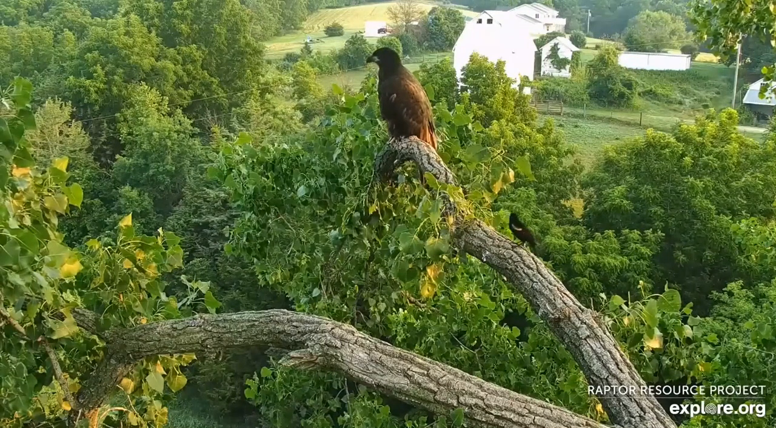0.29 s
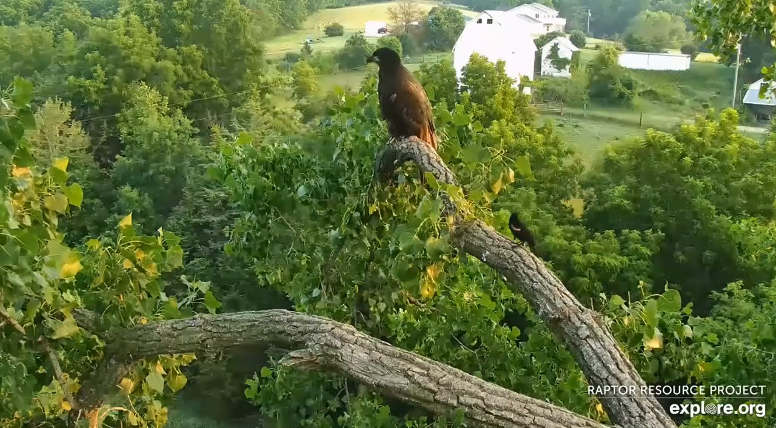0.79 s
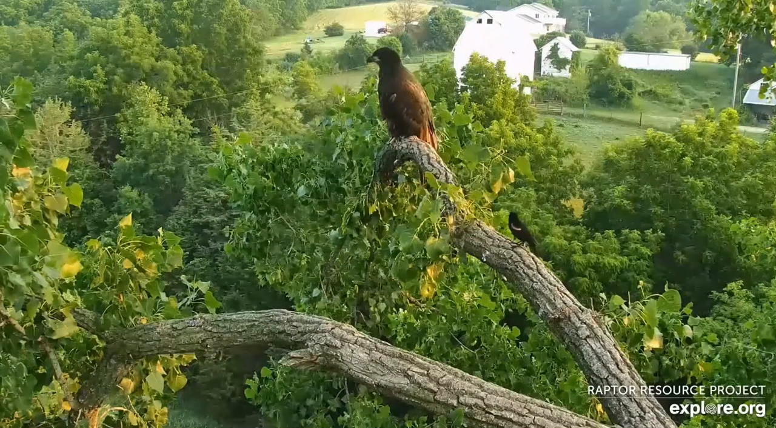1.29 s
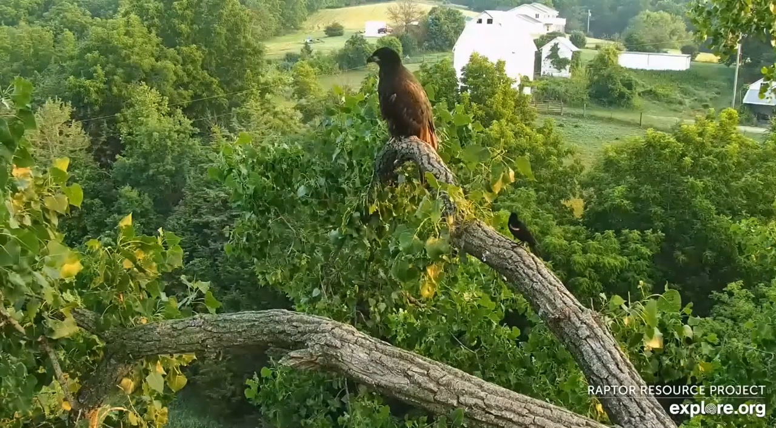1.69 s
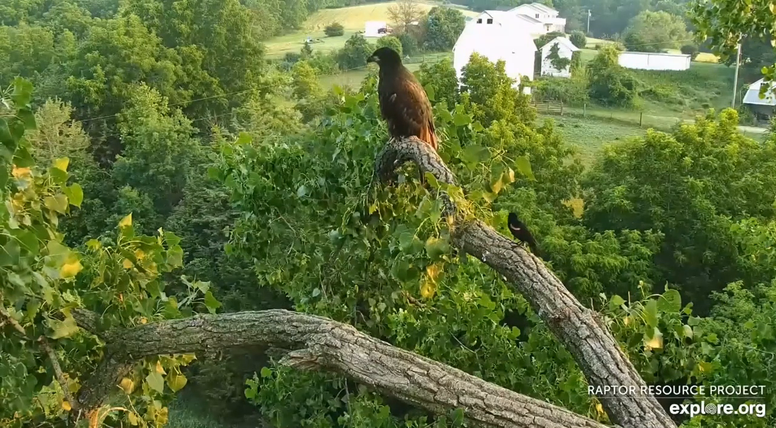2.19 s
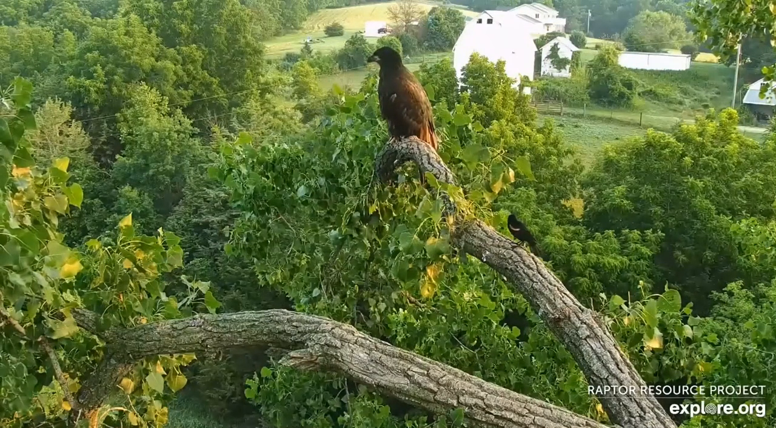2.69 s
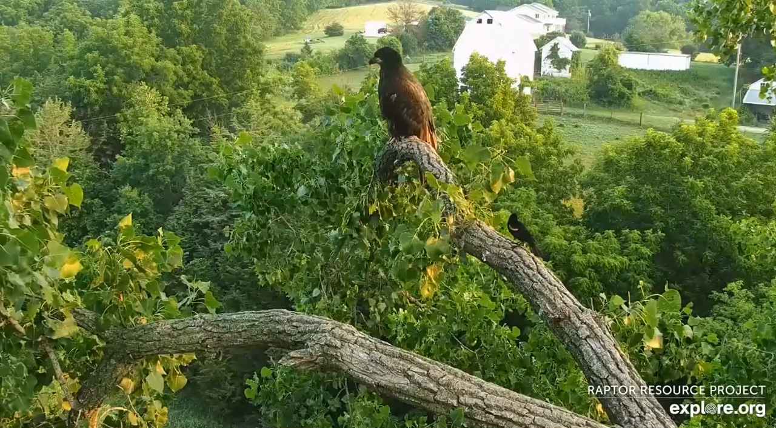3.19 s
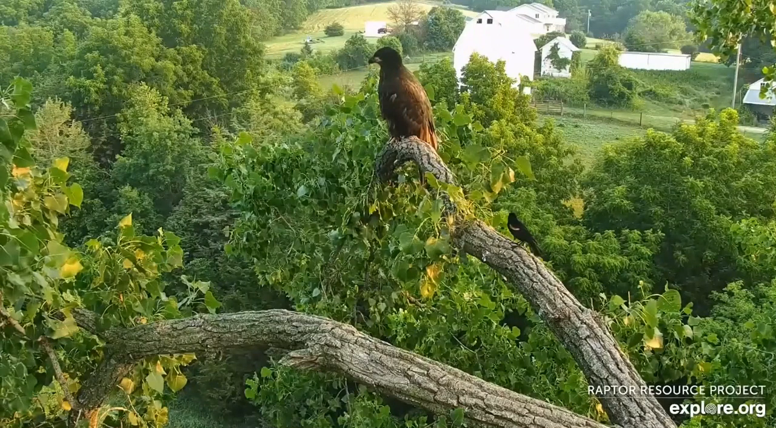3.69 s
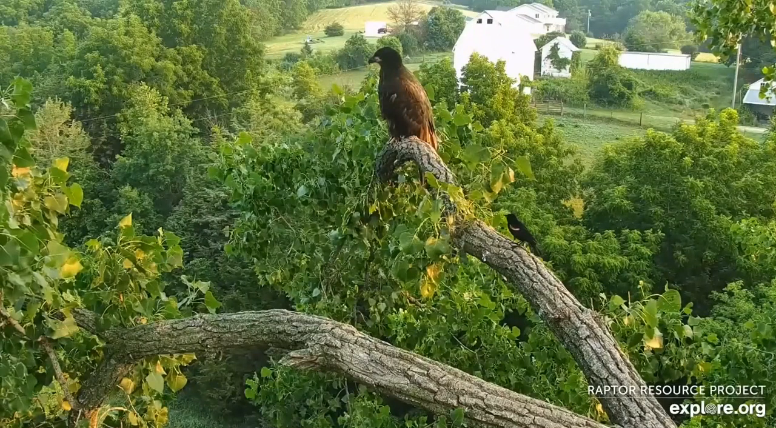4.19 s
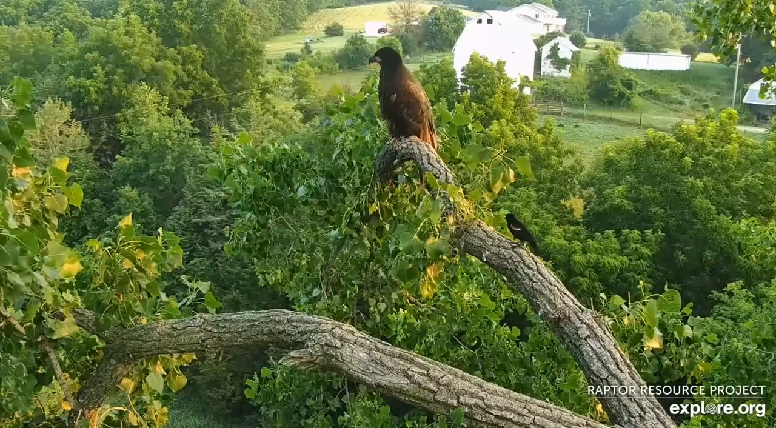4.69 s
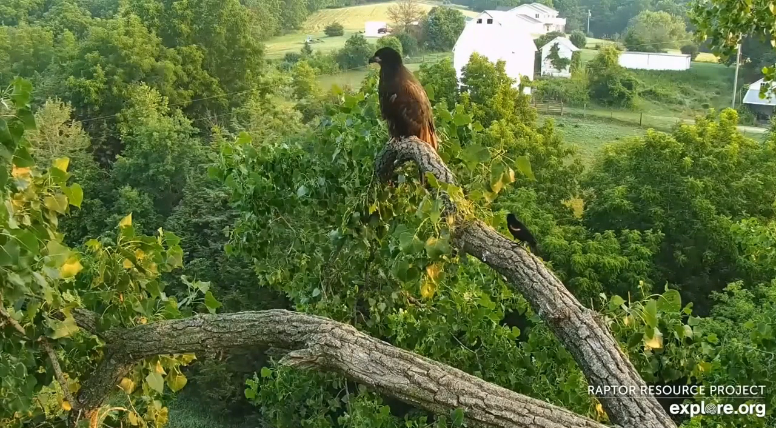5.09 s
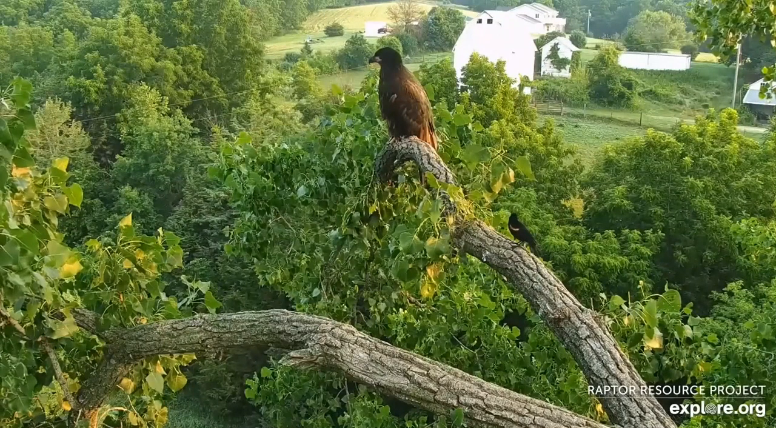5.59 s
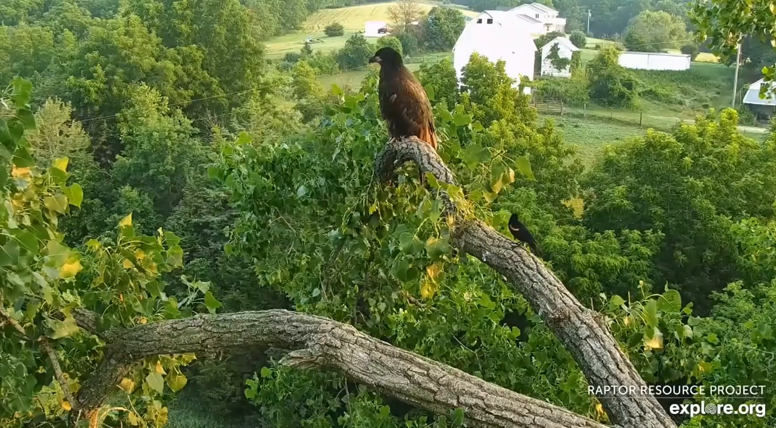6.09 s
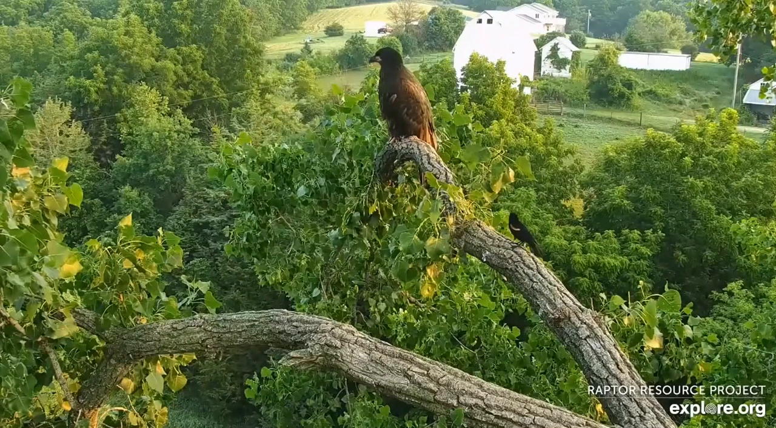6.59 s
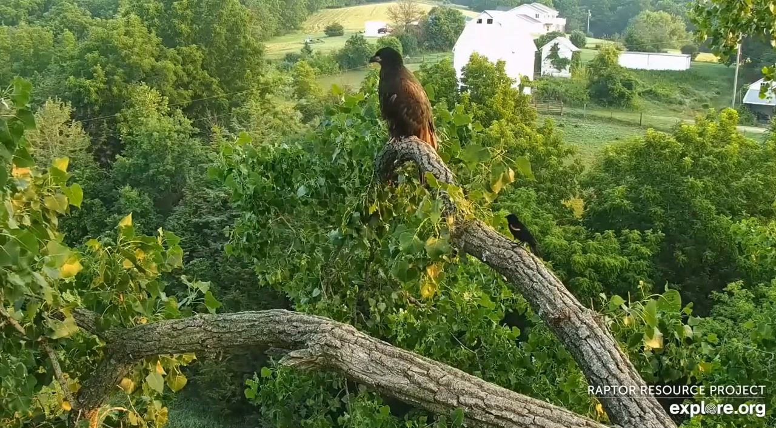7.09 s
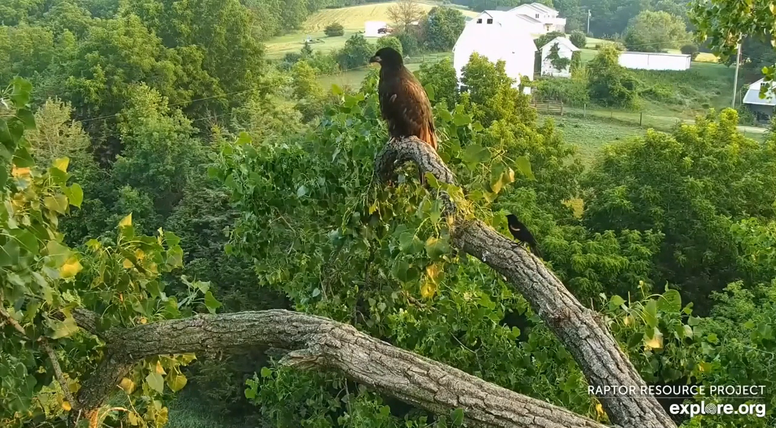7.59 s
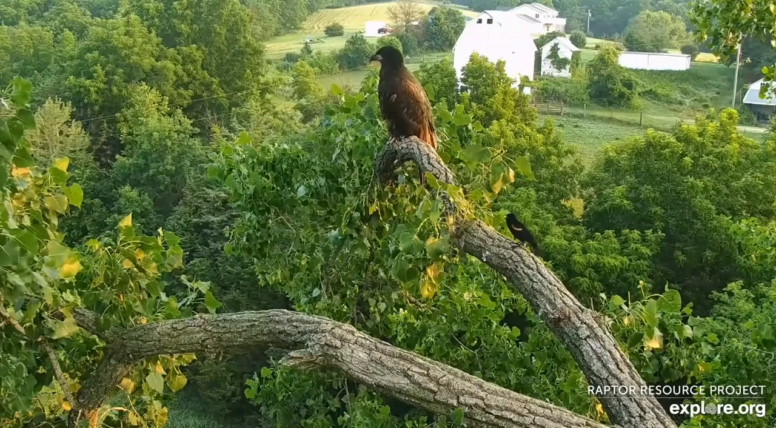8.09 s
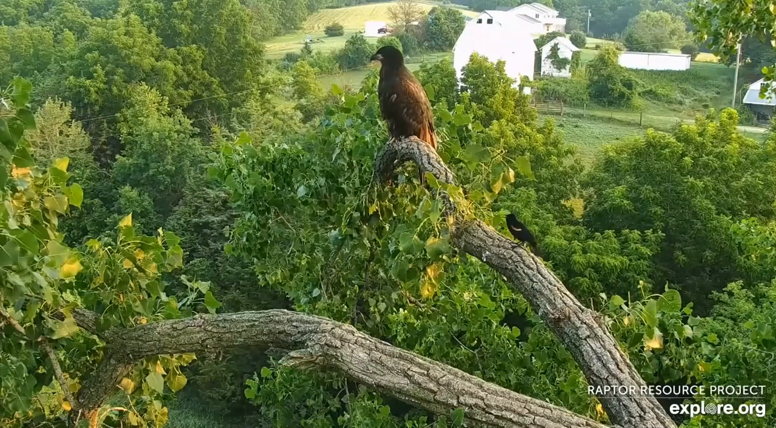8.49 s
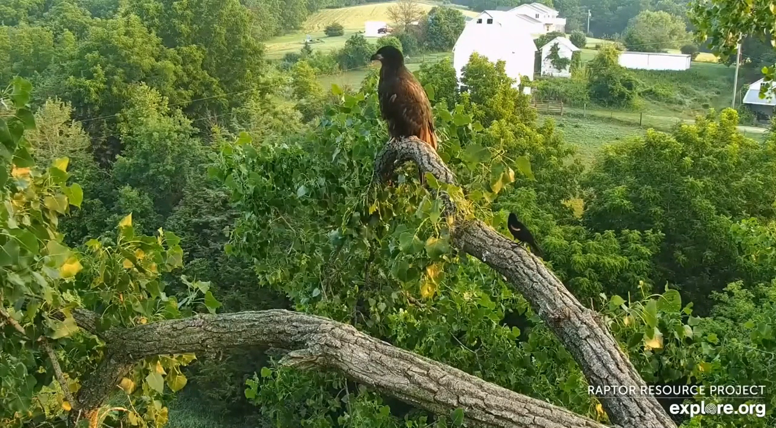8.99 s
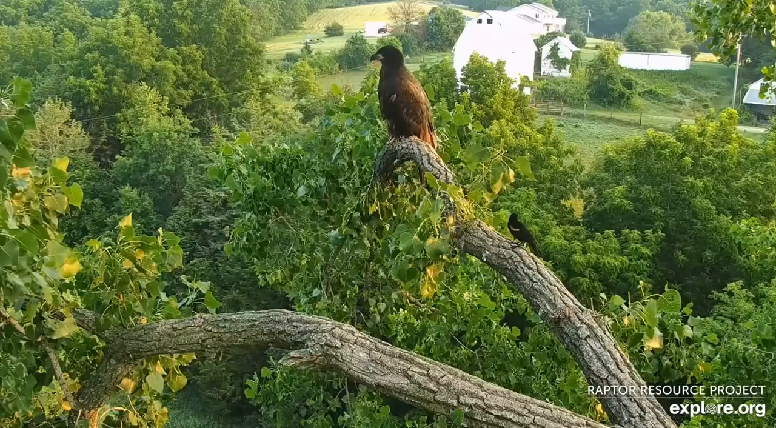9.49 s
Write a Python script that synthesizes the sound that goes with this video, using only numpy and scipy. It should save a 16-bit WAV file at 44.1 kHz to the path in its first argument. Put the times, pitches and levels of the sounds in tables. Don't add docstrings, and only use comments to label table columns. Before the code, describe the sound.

Outdoors in a wooded valley, loud eagle whistles of about a third of a second drop steeply and then settle, echoing lightly from branches and a far slope. Between them come quiet, quick chirps, hoarse little notes and pips from scattered birds, a brief scolding rattle and one hard click-like chuck midway. The bed is low airy noise with faint wavering hum. The coarse camera microphone adds thin mirror tones and slightly squeezed peaks.

```python
import sys
import numpy as np
from scipy import signal
from scipy.fft import rfft, irfft, next_fast_len
from scipy.io import wavfile
from scipy.ndimage import uniform_filter1d, map_coordinates

SR = 44100
rng = np.random.default_rng(int(sys.argv[2]) if len(sys.argv) > 2 else 0)


def generate_wav(sig):
    pcm = np.round(np.clip(np.atleast_2d(sig).T, -1, 1) * 32767).astype(np.int16)
    wavfile.write(sys.argv[1], SR, pcm)


def level_to_linear(level):
    exponent = np.asarray(level, float) / 20
    return 10 ** exponent


N = 431298


def unit(x):
    return x / np.sqrt(np.mean(x ** 2) + 1e-20)


def along(points, hz):
    point_hz, value = np.transpose(points)
    return np.interp(np.log(hz + 1), np.log(point_hz + 1), value)


def curves(rows):
    s, *columns = np.transpose(rows)
    return [np.interp(np.arange(N) / SR, s, column) for column in columns]


def wobble(rate, size=N):
    knots = rng.standard_normal(int(size * rate / SR) + 4)
    return map_coordinates(knots, [np.arange(size) * rate / SR])


def filtered(x, response):
    m = next_fast_len(N + SR // 2)
    return irfft(rfft(x, m) * response(np.fft.rfftfreq(m, 1 / SR)), m)[:N]


def resonance(hz, centre_hz, width_hz):
    damping = 1j * hz * width_hz
    return damping / (centre_hz ** 2 - hz ** 2 + damping)


def notch(offset, width, depth_db):
    return (offset + 1j * width * level_to_linear(-depth_db)) / (offset + 1j * width)


# pitch_hz, density_db [dB per Hz]
AIR_COLOUR = [(10, -46), (22, -19.5), (40, -17.5), (60, -5.5), (150, -8), (300, -6), (650, -5.5),
              (1000, -8), (1800, -17), (2900, -21), (4000, -23), (5000, -33.5), (5600, -32.5), (8000, -68),
              (22000, -120)]
# start_s, upper_level_db, lower_level_db
DOVE_HUM = [(0.0, -51.5, -65), (0.43, -45, -58), (0.98, -57.5, -65), (1.2, -53.5, -53.5),
            (2.15, -44, -56), (2.4, -51, -54.5), (5.4, -56, -60.5), (7.9, -61.5, -62), (8.6, -59, -65),
            (9.0, -53, -55), (9.5, -59, -60.5), (9.78, -47, -36.5)]


def valley():
    z = signal.stft(rng.standard_normal(N), nperseg=512)[2]
    patches = uniform_filter1d(rng.standard_normal(z.shape), size=5, axis=0)
    patches = uniform_filter1d(patches, size=10, axis=1)
    noise = signal.istft(z * level_to_linear(1.5 * unit(patches)), nperseg=512)[1][:N]
    coloured = filtered(noise, lambda hz: level_to_linear(along(AIR_COLOUR, hz)))
    air = level_to_linear(-43 + wobble(2.5)) * unit(coloured)
    upper_db, lower_db = curves(DOVE_HUM)
    t = np.arange(N) / SR
    upper = level_to_linear(upper_db + 1.5 * wobble(9.8)) * np.sin(2 * np.pi * 317 * t + 2.7 * wobble(6.9))
    lower = level_to_linear(lower_db + 1.5 * wobble(8)) * np.sin(2 * np.pi * 175 * t + 2.0 * wobble(51))
    return air + upper + lower


# pitch_hz, t60_s
CANOPY_DECAY = [(500, .6), (3000, 0.82), (5000, 1), (9000, 0.28)]


def trees(x, t60_scale, gap_s):
    hz, t, z = signal.stft(rng.standard_normal(SR), SR, nperseg=256)
    t60 = t60_scale * along(CANOPY_DECAY, hz)[:, None]
    tail = signal.istft(z * level_to_linear(-60 * t / t60), SR, nperseg=256)[1]
    tail = np.pad(tail / np.linalg.norm(tail), (int(abs(gap_s) * SR), 0))
    return signal.fftconvolve(x, tail)[:N]


# centre_s, half_width_ms, depth_db
ECHO_FADES = [(0.041, 4.8, 29), (0.055, 2.1, 11), (0.081, 4.2, 13), (0.113, 5.2, 17), (0.149, 1.4, 8),
              (0.166, 4.0, 10), (0.194, 1.9, 7), (3.69, 2.6, 6), (0.252, 3.7, 18), (0.265, 4.4, 11),
              (1.334, 6.4, 11), (1.401, 4.1, 13), (2.287, 3.8, 7), (2.314, 9.8, 16), (3.709, 2.6, 16),
              (3.722, 3.9, 20), (3.741, 1.4, 8), (4.796, 2.0, 13), (4.813, 1.1, 6), (4.84, 3.2, 10),
              (4.864, 1.3, 6), (4.95, 2.4, 8), (6.957, 5.6, 18), (7.004, 4.7, 22), (8.234, 1.8, 13),
              (8.261, 4.6, 12), (8.28, 2.6, 11), (9.26, 5.0, 21), (9.286, 11.9, 30), (9.338, 2.0, 9)]
# centre_s, half_width_ms, depth_db
WIDE_FADE = (7.2, 30, 7)


def fading(t):
    dips = [notch(t - s, ms / 1e3, db) for s, ms, db in ECHO_FADES + [WIDE_FADE]]
    return np.prod(dips, axis=0)


def glide(rows, settle_hz, overtone_db):
    s, hz, db = np.transpose(rows)
    out = np.zeros(N)
    first = max(round(s[0] * SR), 0)
    t = np.arange(first, round(s[-1] * SR)) / SR
    rest = hz.min() - settle_hz
    pitch = rest + np.exp(np.interp(t, s, np.log(hz - rest)))
    pitch = uniform_filter1d(pitch, size=150, mode="nearest")
    rasp = .125 * wobble(500, size=len(t)) + 0.038 * wobble(4000, size=len(t))
    phase = 2 * np.pi * np.cumsum(pitch) / SR + rasp
    edge = np.minimum(1, np.minimum(t - t[0], t[-1] - t) / 0.0012)
    level = uniform_filter1d(level_to_linear(np.interp(t, s, db)), size=120)
    tone = np.imag(fading(t) * np.exp(1j * phase)) + level_to_linear(overtone_db) * np.sin(2 * phase)
    out[first:first + len(t)] = np.sqrt(2) * edge * level * tone
    return out


# pitch_hz, width_hz, depth_db
BRANCH_NOTCHES = [(3362, 12, 12), (3450, 30, 9), (3510, 42, 8), (3548, 16, 10), (3593, 51, 20),
                  (3649, 24, 10), (3697, 35, 14), (3763, 27, 10), (3808, 25, 17), (3872, 60, 18),
                  (3930, 18, 13), (4009, 60, 22), (4110, 45, 14), (4241, 35, 21)]


def branches(hz):
    spots = np.arange(1, 8) + rng.uniform(-.35, .35, size=7)
    twigs = [(4300 + 270 * spot, 64, 19) for spot in spots]
    comb = np.prod([notch(hz - c, -width, db) for c, width, db in BRANCH_NOTCHES + twigs], axis=0)
    return comb / np.sqrt(uniform_filter1d(np.abs(comb) ** 2, size=3000))


# after_onset_s, pitch_hz, level_db [under full voice]
LOW_OPENING = [
    (-.016, 6292, -45),
    (0, 5982, -16),
    (.02, 4880, -7),
    (.045, 3943, -1),
    (.075, 3590, 1.5),
    (.105, 3456, -0.5),
    (.15, 3361, -2),
]
HIGH_OPENING = [
    (0, 4960, -6.5),
    (.014, 4830, -4.5),
    (0.071, 4627, 0),
    (0.136, 4423, 0),
]
SQUEAK = [
    (-.09, 7550, -50),
    (-.074, 7250, -27),
    (-.06, 5950, -20),
    (-.05, 5800, -36),
    (-.046, 5340, -38),
    (-.036, 5310, -22),
    (-.018, 5210, -26),
    (-.003, 5010, -24),
]
# start_s, opening_stretch, level_db, end_pitch_hz, breath_loss_db
LOW_WHISTLES = [
    (1.116, 1.024, -13, 3224, -7),
    (2.097, .92, -13, 3216, -9.5),
    (6.716, 0.98, -11.5, 3253, -14),
    (8.135, 1.01, -11.5, 3266, -3),
    (9.051, 0.99, -12.5, 3160, -5),
]
HIGH_WHISTLES = [
    (.056, 0.96, -8.5, 4516, -15.5),
    (3.654, 0.99, -7.5, 4450, -5.5),
    (4.745, .97, -7, 4465, -15),
]
LINGER_S_PER_DB = .0013
RELEASE_S, RELEASE_DB = .026, -24


def whistles(calls, opening, plain_s):
    out = np.zeros(N)
    for s, stretch, db, end_hz, sag_db in calls:
        length = plain_s - LINGER_S_PER_DB * sag_db
        close = [(length, end_hz, sag_db), (length + RELEASE_S, end_hz, sag_db + RELEASE_DB)]
        rows = np.vstack([np.multiply(opening, [stretch, 1, 1]), close]) + [s, 0, db]
        call = glide(rows, settle_hz=115.0, overtone_db=-36.5)
        near = level_to_linear(-11) * trees(call, 0.09, 0.0034)
        settled = filtered(call, lambda hz: .15 + resonance(hz, end_hz + 10, 190))
        slope_db = -22 - 2.5 * (end_hz / 1000 - 3.0)
        out += level_to_linear(1.0) * call + near + level_to_linear(slope_db) * trees(settled, 1.03, .02)
    return out


def eagle():
    low = whistles(LOW_WHISTLES, LOW_OPENING, .284)
    high = whistles(HIGH_WHISTLES, SQUEAK + HIGH_OPENING, 0.2056)
    return filtered(low, branches) + high


# start_s, top_pitch_hz, level_db
FLICKED_CHIPS = [
    (.364, 3900, -50),
    (.49, 3800, -51.5),
    (.606, 3600, -49),
    (7.283, 3900, -49),
    (7.4, 3800, -50.5),
    (7.52, 3900, -52),
]
# start_s, top_pitch_hz, level_db
NEAR_PIPS = [
    (1.885, 4880, -46),
    (2.452, 4050, -50),
    (5.53, 3950, -48.5),
    (8.728, 5190, -45.5),
    (8.842, 4040, -42.5),
    (8.95, 4026, -45),
]
# start_s, length_s, start_pitch_hz, level_db
FALLING_SWEEPS = [(0.271, 0.024, 3514, -49.5), (.6, 0.028, 5500, -55), (.75, 0.024, 5500, -56),
                  (0.769, .02, 4050, -49.5), (.9, 0.022, 5800, -56), (0.987, 0.023, 3800, -52),
                  (1.754, 0.034, 3980, -48), (1.832, .04, 3400, -55), (1.98, 0.014, 5000, -53),
                  (2.022, 0.027, 3830, -43.5), (3.188, .05, 3660, -56), (3.36, .05, 2800, -51.5),
                  (3.595, 0.026, 3960, -44.5), (3.87, 0.045, 3500, -41.5), (3.99, 0.041, 3610, -49.5),
                  (4.118, 0.038, 3330, -48.5), (4.257, .035, 3000, -48), (4.375, .012, 2500, -52),
                  (4.42, 0.014, 2600, -46), (4.454, 0.0097, 2490, -43.5), (4.56, 0.046, 2770, -52),
                  (5.432, 0.022, 4600, -46), (5.66, .03, 3900, -48.5), (5.771, .03, 3800, -47),
                  (5.989, 0.022, 5100, -50), (6.0, 0.024, 3900, -49), (6.449, .03, 5400, -56),
                  (6.594, 0.034, 5850, -59), (7.18, .04, 4006, -45), (7.598, 0.023, 4260, -53)]
RISING_SWEEPS = [
    (.686, .035, 1420, -55),
    (.69, .04, 2900, -53),
    (.83, .04, 2700, -52),
    (5.869, .005, 1575, -33),
    (6.382, .03, 2850, -52.5),
    (6.53, .03, 2850, -50.5),
    (7.165, .015, 4360, -48),
    (7.283, .015, 4400, -50.5),
    (8.712, .018, 3715, -55),
]
# start_s, length_s, start_pitch_hz, level_db, hoarseness
HOARSE_NOTES = [
    (.718, .18, 1880, -44.5, 1.1),
    (1.794, 0.183, 1920, -46.5, 1.6),
    (1.908, .023, 5136, -52, .5),
    (4.209, 0.035, 3267, -46, 0.34),
    (5.419, .02, 5000, -49.5, .6),
    (5.545, .083, 4950, -59, .9),
    (7.144, .035, 4700, -49.5, .3),
    (7.68, 0.22, 2980, -54, 1.86),
]
# start_s, length_s, start_pitch_hz, end_pitch_hz, level_db
CLEAR_PIPES = [
    (2.04, .015, 4000, 3950, -46),
    (3.138, .045, 2900, 3000, -52),
    (3.4, .15, 4500, 4500, -64),
    (4.169, .035, 3100, 2900, -50),
    (5.458, .06, 3000, 2880, -54),
    (7.366, .055, 2080, 1950, -48),
    (8.01, .08, 2030, 1850, -48.5),
    (8.56, .06, 2620, 2600, -55),
    (8.696, .065, 2000, 2115, -45),
]
FLICK_S, SWEEP_HOARSE = .022, .14


def chirps():
    notes = []
    for rows, first, drop_s in ((FLICKED_CHIPS, .89, .048), (NEAR_PIPS, 0.94, 0.027)):
        notes += [(s, FLICK_S, first * hz, hz, db + 1.0, SWEEP_HOARSE) for s, hz, db in rows]
        notes += [(s + FLICK_S, drop_s, .95 * hz, .63 * hz, db, SWEEP_HOARSE) for s, hz, db in rows]
    flock = [(u * N / SR, .04, 3300 * (.8 + .4 * v), -61 + 5 * w) for u, v, w in rng.random(size=(60, 3))]
    notes += [(s, length, hz, .72 * hz, db, SWEEP_HOARSE) for s, length, hz, db in FALLING_SWEEPS + flock]
    notes += [(s, length, hz, 1.33 * hz, db, SWEEP_HOARSE) for s, length, hz, db in RISING_SWEEPS]
    notes += [(s, length, hz, 0.96 * hz, db, hoarse) for s, length, hz, db, hoarse in HOARSE_NOTES]
    return notes + [(*row, .25) for row in CLEAR_PIPES]


def songbirds():
    dry = np.zeros(N + SR)
    for s, length, start_hz, end_hz, db, hoarse in chirps():
        u = np.arange(round(length * SR)) / (length * SR)
        bend = u if end_hz < start_hz else u ** 2.0
        pitch = start_hz * (end_hz / start_hz) ** bend
        smear = 1.9 * hoarse * (start_hz / 3500) ** 1.5 * wobble(300, size=len(u))
        phase = 2 * np.pi * np.cumsum(pitch) / SR + smear
        flutter = level_to_linear(db + 3.2 * wobble(140, size=len(u)))
        dry[round(s * SR):][:len(u)] += flutter * np.sin(np.pi * u) ** 0.13 * np.sin(phase)
    return 1.29 * dry[:N] + level_to_linear(-0.3) * trees(dry[:N], 0.3, .004)


# start_s, length_s, pulse_rate_hz, level_db
SCOLD = (5.172, .15, 45, -41)


def rattle():
    s, length, beat, db = SCOLD
    t = np.arange(N) / SR - s
    decay_db = -18 * (t * beat % 1) - 35 * np.clip(t, 0, length)
    puffs = (t > 0) * (t < length) * level_to_linear(decay_db)
    dry = filtered(puffs * rng.standard_normal(N), lambda hz: resonance(hz, 2600, 2600) ** 3)
    return level_to_linear(db + 16.5) * (dry + level_to_linear(-8) * trees(dry, 0.39, 0.0017))


# start_s, pitch_hz, level_db
CHUCK_FALL = [
    (5.86, 3685, -38),
    (5.873, 3447, -32),
    (5.875, 3215, -16.5),
    (5.879, 2710, -19),
    (5.881, 2170, -17),
    (5.882, 1867, -45),
]


def chuck():
    note = glide(CHUCK_FALL, settle_hz=950, overtone_db=-29)
    bounce = level_to_linear(1.5) * np.roll(note, 320)
    near = level_to_linear(-3.0) * trees(note, 0.16, 0.008)
    far = level_to_linear(-15.0) * trees(note, 0.69, 0.023)
    return note + filtered(bounce + near + far, lambda hz: resonance(hz, 3000, 800) ** 2)


def scene():
    return (valley() + eagle() + songbirds() + rattle() + chuck())[None]


def band_limit(x):
    return signal.sosfilt(signal.butter(12, 11200, fs=SR, output="sos"), x)


# pitch_hz, level_db
PLAYBACK_FILTER = [(20, -0.5), (9000, -0.5), (10500, -2), (11000, -14), (11400, -60), (22000, -90)]
CAMERA_HZ, STREAM_HZ = 16000, 48000


def record(dry):
    stream = signal.resample_poly(dry[0], 160, 147)
    mirror = stream * np.cos(2 * np.pi * CAMERA_HZ * np.arange(len(stream)) / STREAM_HZ)
    mirror = signal.sosfilt(signal.butter(2, 15000, fs=STREAM_HZ, output="sos"), mirror)
    stream = stream + level_to_linear(-18) * mirror
    stream = stream + 0.022 * stream ** 2
    stream = stream / (1 + np.abs(stream / 0.54) ** 6) ** (1 / 6)
    half = stream[np.arange(N // 2) * 2 * STREAM_HZ // SR]
    played = signal.resample(half, 2 * len(half))
    played = filtered(played, lambda hz: level_to_linear(along(PLAYBACK_FILTER, hz)))
    return band_limit(played[None])


dry = scene()
out = record(dry)
generate_wav(out)
```